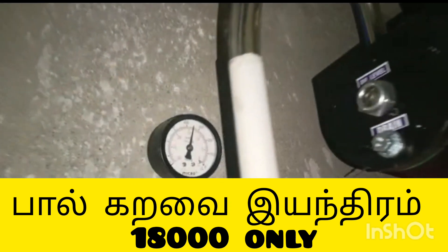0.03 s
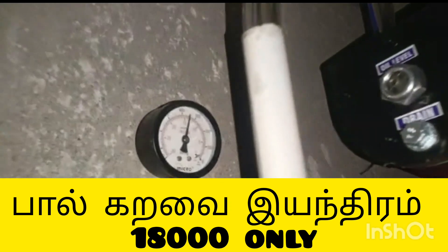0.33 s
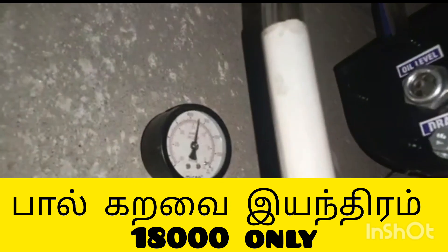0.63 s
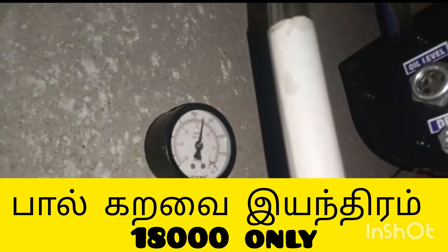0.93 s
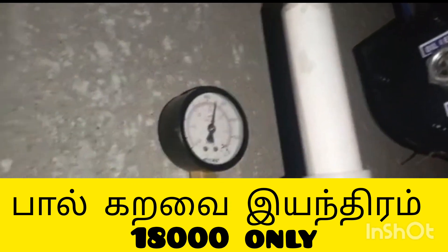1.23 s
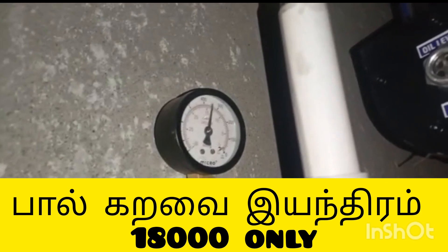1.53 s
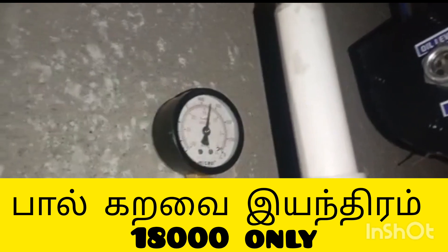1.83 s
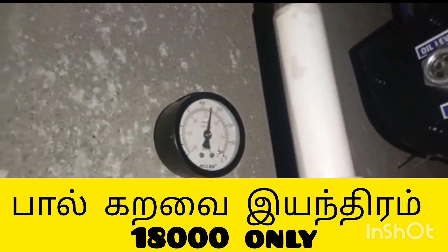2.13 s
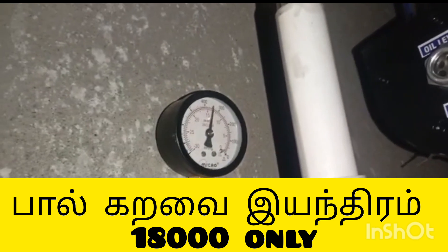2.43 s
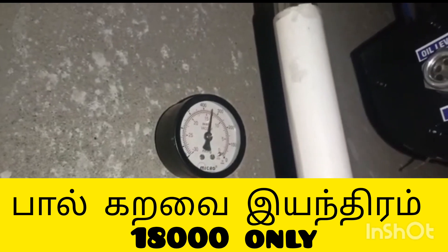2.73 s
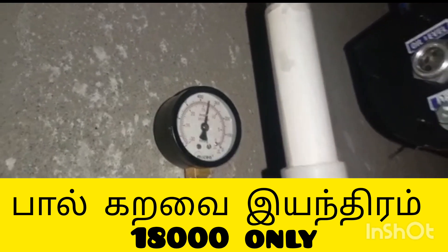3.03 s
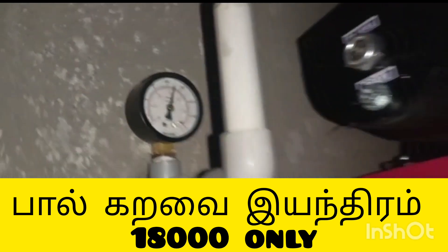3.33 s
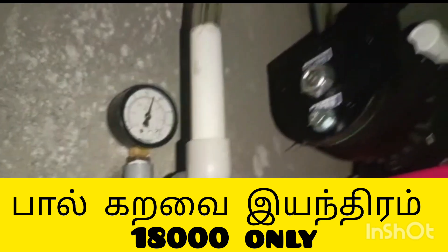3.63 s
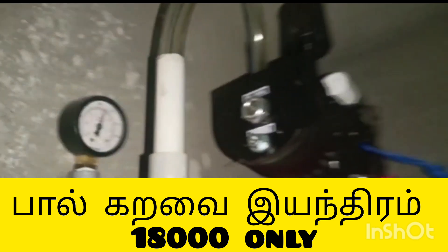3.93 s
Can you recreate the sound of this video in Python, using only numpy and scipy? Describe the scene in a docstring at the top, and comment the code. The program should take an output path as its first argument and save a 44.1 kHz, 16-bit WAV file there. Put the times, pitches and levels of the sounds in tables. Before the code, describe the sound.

Steady vacuum pump running close by indoors, droning low under a bright, whining hiss.

```python
"""Indoors, close to a hand-held microphone, a milking machine's rotary-vane vacuum pump runs steadily.
Air and fan rush, the bearings whine, the sliding vanes scrape, hiss and make the casing sing.
Four vanes a turn puff out a low drone.
The balance of the parts shifts a little as the microphone moves."""
import sys
import numpy as np
from scipy import signal
from scipy.fft import rfft, irfft
from scipy.io import wavfile

SR = 44100
rng = np.random.default_rng(int(sys.argv[2]) if len(sys.argv) > 2 else 0)


def wav_record(signal):
    """Record a signal, one row per channel, as 16-bit PCM in the file named by sys.argv[1]."""
    frames = np.transpose(np.atleast_2d(signal))
    bounded = np.clip(frames, -1, 1)
    # unit amplitude maps onto the largest positive 16-bit level
    quanta = np.round(bounded * 32767).astype(np.int16)
    wavfile.write(sys.argv[1], SR, quanta)


N = 176400

SHAFT_HZ, VANES = 46.845, 4
WOBBLE_TURNS, WOBBLE_HZ = 0.0011, 21.9
WHINE_WIDTH_HZ, CUTOFF_HZ = 3.8, 15740


def amp(db):
    """Decibels to gain."""
    return 10 ** (np.asarray(db) / 20)


def unit(x):
    """Scale to rms 1."""
    return x / np.sqrt(np.mean(abs(x) ** 2) + 1e-20)


def times():
    """Sample times in s."""
    return np.arange(N) / SR


def curve(rows, column=1):
    """Gain over time from a dB column."""
    rows = np.array(rows)
    return amp(np.interp(times(), rows[:, 0], rows[:, column]))


def colour(points, hz):
    """Gain of a spectrum at hz."""
    f, db = np.transpose(points)
    return amp(np.interp(np.log(hz + 1), np.log(f + 1), db))


def noise(shape):
    """Noise of rms 1 with spectrum shape(f)."""
    return unit(irfft(rfft(rng.standard_normal(N)) * shape(np.fft.rfftfreq(N, 1 / SR)), N))


def band(hz, width_hz):
    """Noise in one resonance; at 0 Hz, a random drift."""
    return noise(lambda f: 1 / (1 + ((f - hz) / width_hz) ** 2))


def whine(hz, db, roughness=0.18):
    """Tone wavering in level and phase."""
    phase = 2 * np.pi * (hz * times() + rng.random())
    return amp(db) * unit(np.cos(phase) * np.sqrt(2) + roughness * band(hz, WHINE_WIDTH_HZ))


# Microphone path (time [s], distance [0 close, 1 far])
MIC_PATH = [(0, 1), (.3, .7), (.6, .2), (1.3, 0), (2.7, 0), (3.05, .25), (3.35, .8), (3.65, 1)]

def distance():
    """How far the microphone is drawn back."""
    return np.interp(times(), *np.transpose(MIC_PATH))


# Air spectrum (frequency [Hz], relative density [dB])
RUSH = [(20, -103), (45, -89), (75, -76), (100, -71), (200, -61.5), (300, -67.5), (450, -66.5), (650, -69),
        (900, -69.5), (1450, -77), (1600, -77.5), (1850, -63.5), (2100, -69.5), (2450, -72), (2700, -68.5),
        (2950, -75.5), (3250, -67.5), (3700, -70), (4600, -75), (6000, -78), (16000, -100)]

def air_rush(level_db=-32):
    """Broadband rush of air and fan."""
    return amp(level_db) * noise(lambda f: colour(RUSH, f))


# Envelope of the bearing partials (frequency [Hz], relative density [dB])
PARTIALS = [(600, -11.5), (1400, -13), (1550, -2.5), (1900, -5.5), (2150, -12), (2750, 0), (3000, -7),
            (3300, -12), (3600, -14), (4400, -13.5), (5500, -7.5), (7500, -7.5)]

def bearing_partials(count=220, level_db=-32.5, spread_db=2.5):
    """Rolling bearings: many faint lines, each unsteady from a skirt of noise."""
    grid_hz = np.geomspace(PARTIALS[0][0], PARTIALS[-1][0], count)
    shift, strength, phase = rng.random((count, 3)).T
    hz = grid_hz + shift * np.gradient(grid_hz)
    gains = colour(PARTIALS, hz) * np.sqrt(hz) * amp(spread_db * (5 * strength - 2))
    lines = np.zeros(N // 2 + 1, complex)
    lines[np.round(hz * N / SR).astype(int)] = gains * np.exp(2j * np.pi * phase)
    offset_hz = np.arange(-200, 201) * SR / N
    line_shape = 1 / (1 + (offset_hz / WHINE_WIDTH_HZ) ** 2) ** 2
    skirt_power = signal.fftconvolve(abs(lines) ** 2, line_shape, "same")
    skirts = noise(lambda f: np.sqrt(abs(skirt_power)))
    return amp(level_db) * unit(unit(irfft(lines, N)) + 0.82 * skirts)


# Scrape envelope (frequency [Hz], relative density [dB])
SCRAPE = [(600, -10), (1400, -11), (1600, 2.5), (1850, 8), (2100, 2), (2750, 2.5), (3000, -3), (3500, -3),
          (4400, -7.5), (5500, -9), (7400, -4), (8000, -2.5), (8700, 11.5), (9600, 2), (15700, 0)]

def bore_scrape(turns, size=8192, level_db=-33, spread_db=4):
    """Vanes meet the same bore roughness each turn: a dense buzz on shaft harmonics."""
    hz = np.arange(size // 2 + 1) * SHAFT_HZ
    strength, phase = rng.random((len(hz), 2)).T
    in_band = (hz > SCRAPE[0][0]) * (hz < CUTOFF_HZ)
    gains = colour(SCRAPE, hz) * amp(spread_db * (5.3 * strength - 2)) * in_band
    one_turn = unit(irfft(gains * np.exp(2j * np.pi * phase)))
    return amp(level_db) * np.interp(turns, np.arange(size) / size, one_turn, period=1)


# Tone pair (frequency [Hz], level [dB])
SWELL_TONES = [(3516, -44), (3551, -47)]
# Its swells (time [s], gain [dB])
SWELL_GAIN = [(0, -2), (1.1, 0), (1.24, 8.5), (1.4, -1), (1.9, 0), (2.07, 6.5), (2.35, 0), (2.8, 6),
              (3.15, 3), (3.5, -2)]

def swelling_pair():
    """Two close tones that swell briefly now and then."""
    return curve(SWELL_GAIN) * sum(whine(*row) for row in SWELL_TONES)


# Motor and bearing tones (frequency [Hz], level [dB])
WHINES = [(118.4, -53), (1150, -52), (1518, -50), (1593, -46.5), (1779, -50.5), (1814, -47), (1900, -43),
          (1937, -42.5), (2067, -47), (2250, -47.5), (2309, -51.5), (2342, -45.5), (2476, -48),
          (2525, -39.5), (2616, -50), (2982, -54), (3171, -48.5), (5340, -45), (5561, -45), (7171, -48.5),
          (7542, -43.5), (7730, -51), (7919, -46)]

def faint_whines(follow=0.17):
    """Motor and bearings whine, following a share of the casing ring's dB changes."""
    tones = sum(whine(*row) for row in WHINES)
    return curve(RING_GAIN) ** follow * (tones + bearing_partials())


# Strongest bearing tone and side tones (frequency [Hz], level [dB], gain exponent)
BEARING = [(2670, -42.5, 1.33), (2708.4, -35, 0.85), (2760, -43.5, 1)]
# Balance as the microphone moves (time [s], bearing gain [dB], squeal gain [dB])
MIC_GAINS = [(0, 2.5, -11), (.3, -5, -0.5), (.6, -1.5, -2), (1.2, -3, 1), (1.75, 1.8, 0), (2.1, 0, 1.5),
             (2.8, 0.5, 0), (3.1, 1.5, -1), (3.41, 2, -2), (3.49, 6, -1.5), (3.76, 8, -1),
             (3.87, -0.5, -1.5), (4, 6, -0.5)]

def bearing_tone(rattle_db=-45, rattle_exponent=1.7):
    """Strong tone that swells as the microphone turns; its rattle grows faster."""
    gain = curve(MIC_GAINS, column=1)
    rattle = amp(rattle_db) * gain ** rattle_exponent * band(hz=2710, width_hz=160)
    return rattle + sum(gain ** exponent * whine(hz, db) for hz, db, exponent in BEARING)


# Casing resonances (frequency [Hz], half-width [Hz], level [dB])
CASING = [(1606, 91, -47), (3255, 79, -44.5), (3552, 35, -43.5), (5390, 55, -40), (5560, 59, -37),
          (6400, 37, -42), (6955, 32, -38)]
# Ring envelope (time [s], gain [dB])
RING_GAIN = [(0, -2.5), (.35, 0), (1.2, 1), (1.6, -.5), (2, 1), (2.4, 0), (3, 1), (3.2, -3.5), (3.52, -8),
             (3.78, -9), (3.86, .5), (4, -1)]

def casing_ring():
    """Casing resonances rubbed by the vanes."""
    return curve(RING_GAIN) * sum(amp(db) * band(hz, width) for hz, width, db in CASING)


# Highest resonances (frequency [Hz], half-width [Hz], close level [dB], far level [dB])
SIZZLE = [(8890, 71, -50, -32), (9540, 38, -43, -46), (10280, 49, -41.5, -39.5), (11030, 44, -48, -43),
          (11390, 250, -34.5, -43.5), (11740, 65, -50, -38), (12400, 55, -46, -50), (13450, 80, -38, -38),
          (14700, 230, -37, -34), (15120, 56, -40, -37), (15600, 87, -33, -33)]

def sizzle():
    """Top resonances; their balance shifts with microphone distance."""
    away = distance()
    return sum(amp(close_db + (far_db - close_db) * away) * band(hz, width)
               for hz, width, close_db, far_db in SIZZLE)


# Shrill resonances (frequency [Hz])
SQUEAL_HZ = [7935, 8078, 8478, 8440, 8666, 8655]
# Their shapes, same order (half-width [Hz], level [dB])
SQUEAL = [(35, -36.5), (30, -30), (7, -32.5), (30, -33), (7, -31.5), (50, -31)]

def squeal():
    """Shrill resonances driven by vane friction."""
    modes = sum(amp(db) * band(hz, width) for hz, (width, db) in zip(SQUEAL_HZ, SQUEAL))
    return curve(MIC_GAINS, column=2) * modes


def wall_echoes(x, count=6, max_delay_s=0.008, drift_s=0.00015, echo_db=-15.5):
    """Nearby walls form a comb filter that slides as the microphone moves."""
    t, away = times(), distance()
    paths = rng.uniform((0.2, -1), (1, 1), (count, 2))
    delays_s = [max_delay_s * length + drift_s * slant * away for length, slant in paths]
    echoes = sum(np.interp(t - delay, t, x, left=0) for delay in delays_s)
    return (x + amp(echo_db) * echoes) / np.sqrt(1 + count * amp(echo_db) ** 2)


# Sliding-vane hiss (frequency [Hz], relative density [dB])
HISS = [(2000, -92), (4700, -85), (4900, -64.5), (5150, -70), (5700, -66.5), (6000, -71.5), (6300, -65.5),
        (6750, -67), (7750, -66), (8000, -53.5), (8300, -59.5), (8750, -58), (9250, -61.5), (9450, -65),
        (10700, -66.5), (12100, -67), (13400, -65), (14300, -63.5), (15300, -59), (15700, -60)]

def vane_friction(turns, hiss_db=-19, flicker_db=0.7, flicker_hz=40):
    """Sliding friction hisses and rings the casing, pulsing with each vane and each turn."""
    angle = 2 * np.pi * turns
    pressure = 1 + 0.048 * np.cos(VANES * angle) + 0.022 * (np.cos(angle) + np.cos((VANES - 1) * angle))
    beat = 1 + 0.075 * np.cos((VANES + 1) * angle)
    hiss = amp(hiss_db) * noise(lambda f: colour(HISS, f))
    resonances = beat * (squeal() + casing_ring()) + sizzle()
    flicker = amp(flicker_db * band(0, flicker_hz))
    return pressure * flicker * (wall_echoes(hiss) + resonances)


# Exhaust harmonics (multiple of vane rate, level [dB], change when far [dB])
PUFFS = [(1, -24.3, -.4), (2, -31.5, -.3), (3, -25.8, .3), (4, -35.7, -.5), (5, -42.9, 0)]
# Even harmonics as the microphone moves (time [s], gain [dB])
EVEN_GAIN = [(0, -1.8), (.3, -1.2), (.6, -.1), (1.2, .4), (2.7, .4), (3.0, -.5), (3.3, -3), (3.75, -4.2),
             (4, -5.5)]
# Unequal-vane tones (multiple of shaft rate, level [dB])
SHAFT_ORDERS = [(1, -75), (2, -50.5), (7, -46.5), (9, -53.5), (11, -46), (14, -57)]

def exhaust_drone(turns, sway_db=0.18, sway_hz=2.1, flutter_depth=0.025, lag_rad=0.27):
    """One exhaust puff per vane; unequal vanes add weak shaft orders."""
    angle, drone = 2 * np.pi * turns, np.zeros(N)
    for k, db, far_change_db in PUFFS:
        level = amp(db + far_change_db * distance() + sway_db * band(0, sway_hz))
        level *= 1 + flutter_depth * band(0, WOBBLE_HZ)
        if k % 2 == 0:
            level *= curve(EVEN_GAIN)
        drone += level * np.cos(k * VANES * angle - lag_rad * k ** 2)
    for order, db in SHAFT_ORDERS:
        drone += amp(db) * np.cos(round(order) * angle + 2 * np.pi * rng.random())
    return np.sqrt(2) * drone


def scene():
    """The whole pump, same in both channels."""
    turns = SHAFT_HZ * times() + WOBBLE_TURNS * band(0, WOBBLE_HZ)
    air = air_rush() + exhaust_drone(turns)
    whines = bearing_tone() + faint_whines() + swelling_pair()
    friction = vane_friction(turns) + bore_scrape(turns)
    return np.tile(air + whines + friction, (2, 1))


def record(dry):
    """Steep low-pass at CUTOFF_HZ."""
    taps = signal.firwin(1501, CUTOFF_HZ, window=("kaiser", 9), fs=SR)
    return signal.oaconvolve(dry, taps[None], "same")


dry = scene()
out = record(dry)
wav_record(out)
```